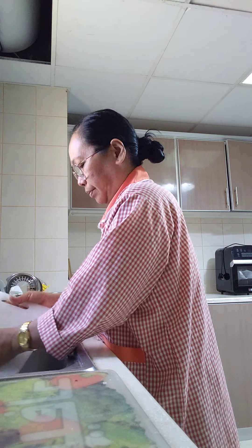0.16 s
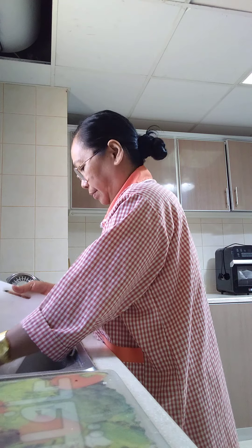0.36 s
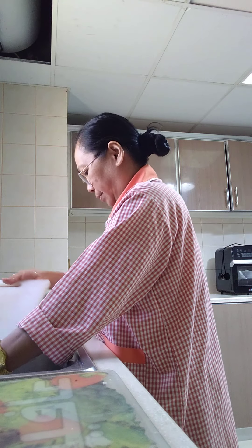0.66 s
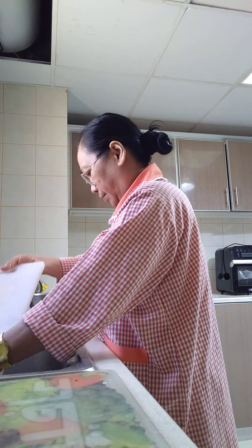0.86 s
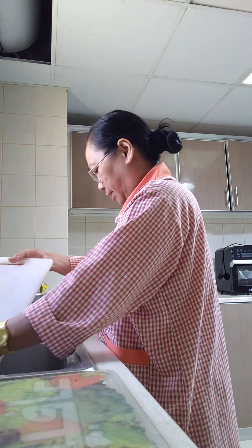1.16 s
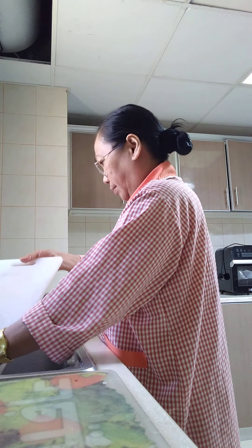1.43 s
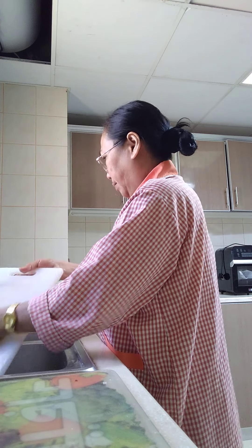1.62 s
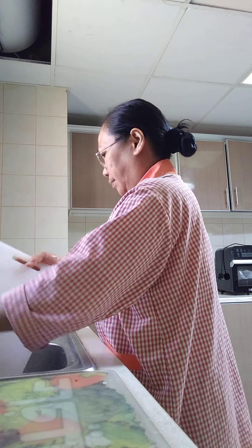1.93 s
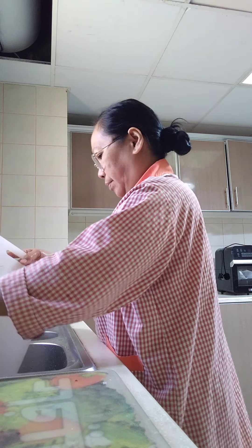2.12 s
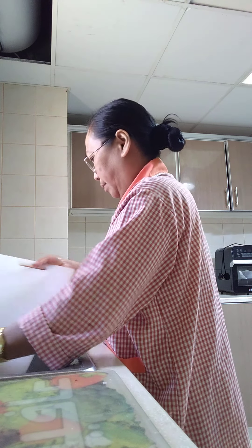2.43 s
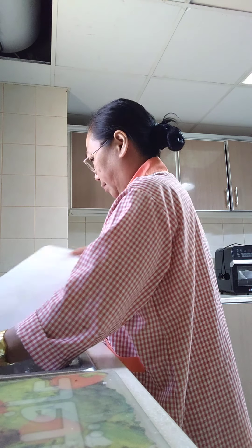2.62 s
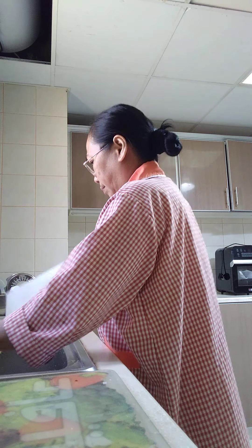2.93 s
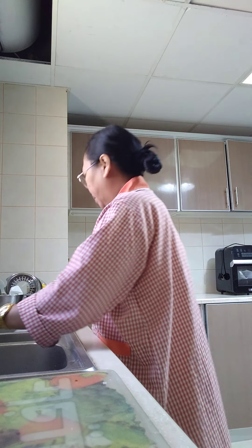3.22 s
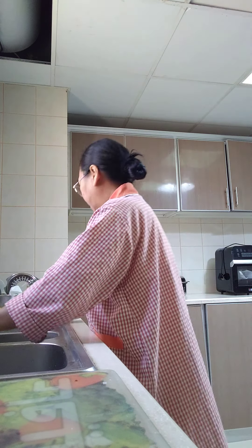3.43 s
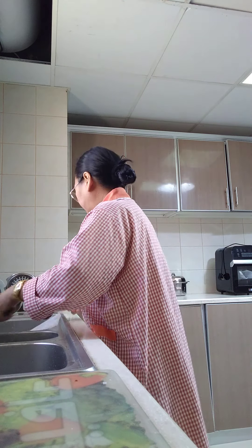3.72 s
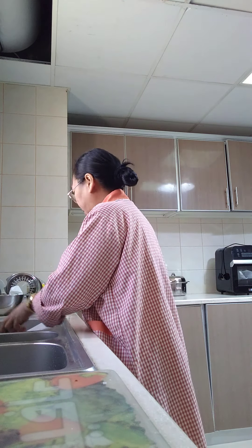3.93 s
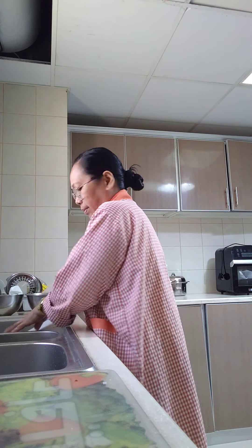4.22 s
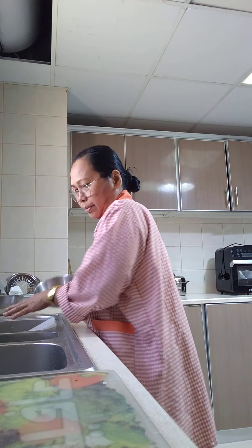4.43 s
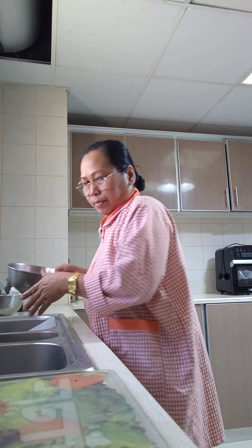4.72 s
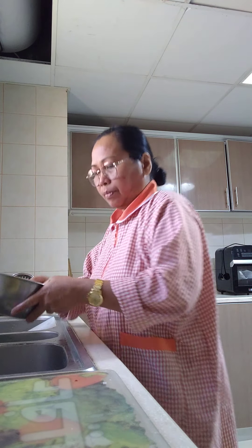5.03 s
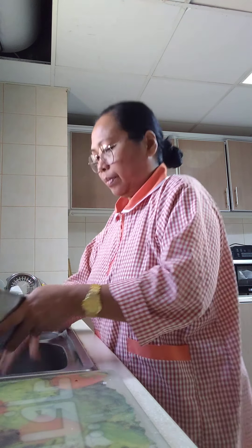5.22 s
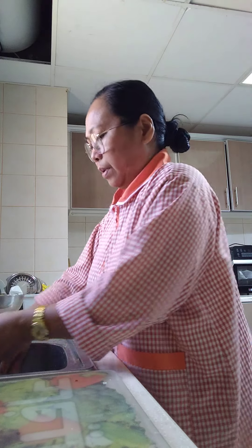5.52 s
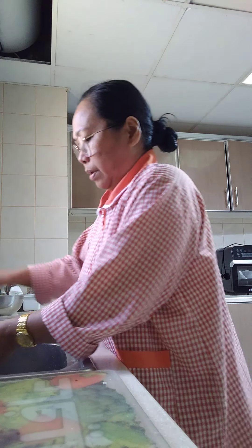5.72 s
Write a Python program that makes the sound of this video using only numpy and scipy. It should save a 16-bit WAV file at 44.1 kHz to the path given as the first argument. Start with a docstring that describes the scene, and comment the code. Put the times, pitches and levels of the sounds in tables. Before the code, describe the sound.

Close phone pickup beside a kitchen sink: steady fine water hiss, with a heavy thud and rattle at once, ticking drips, and occasional bumps. Just after three seconds, rapid booming knocks, drags and clanks on the steel basin last about a second, then watery gurgles and a few faint clatters, with a short tiled echo.

```python
"""A hard knock and a clatter come first, over a tap running into a steel kitchen sink; a plastic board and
a steel bowl are then rinsed, dragged and set down. Water is shaped noise plus swarms of ringing drops and
bubbles; knocks and rattles ring damped modes of basin and rim; drags shake the basin with noise.
A tiled room answers over a faint rumble. A phone with two microphone ports stands on the counter,
the sink about 2 cm nearer the left port."""
import sys
import numpy as np
from scipy import signal
from scipy.fft import rfft, irfft, next_fast_len
from scipy.io import wavfile
from scipy.ndimage import uniform_filter1d, map_coordinates

SR = 44100
rng = np.random.default_rng(int(sys.argv[2]) if len(sys.argv) > 2 else 0)


def transcribe(u):
    """Save the signal u as a 16-bit wav file named by the first command-line argument.

    u: samples, shape (n,) or (channels, n), limited to [-1, 1]; the rate is SR.
    q: integer samples, one column per channel.
    """
    v = np.clip(np.atleast_2d(u).T, -1, 1)
    q = np.round(v * 32767).astype(np.int16)
    wavfile.write(sys.argv[1], SR, q)


N = 258337  # samples, about 5.86 s


def amp(db):
    """Decibels to gain."""
    return 10 ** (np.asarray(db) / 20)


def unit(x):
    """Scales a signal to rms 1."""
    return x / np.sqrt(np.mean(x ** 2) + 1e-20)


def along(points, hz):
    """Reads (f/Hz, value) points on a log frequency axis."""
    f, v = np.transpose(points)
    return np.interp(np.log(hz + 1), np.log(f + 1), v)


def curves(rows):
    """One dB curve over time per level column; -120 dB outside the table."""
    s, *cols = np.transpose(rows)
    t = np.arange(N) / SR
    ends_early = s[-1] < N / SR - .05  # a table that reaches the end of the scene holds its last value
    return [np.interp(t, s, c, -120, -120 if ends_early else c[-1]) for c in cols]


def wobble(rate):
    """A smooth random curve with rate knots a second."""
    knots = rng.standard_normal(int(N * rate / SR) + 4)
    return map_coordinates(knots, [np.arange(N) * rate / SR])


def filtered(x, response):
    """Applies a complex response of frequency to x."""
    m = next_fast_len(x.shape[-1] + SR // 2)
    spectrum = rfft(x, m) * response(np.fft.rfftfreq(m, 1 / SR))
    return irfft(spectrum, m)[..., :x.shape[-1]]


def add(track, s, sound):
    """Mixes a sound into the track at s seconds."""
    part = track[round(s * SR):][:len(sound)]
    part += sound[:len(part)]


def patchy_noise(patchy_db):
    """Two unrelated noises sharing patches of random gain in time and frequency."""
    z = signal.stft(rng.standard_normal((2, N + 512)), nperseg=512)[2]
    field = uniform_filter1d(rng.standard_normal(z.shape[1:]), 6, 0)
    field = uniform_filter1d(field, 8, 1)
    return signal.istft(z * amp(patchy_db * unit(field)), nperseg=512)[1][:, :N]


def grains(count, hz, spread, cycles, scatter_db, rise, size):
    """Two unrelated swarms of damped drops whose pitch rises."""
    draw = rng.random((count, 3))  # loudness, moment, swarm
    pitch = np.clip(hz * np.exp(spread * rng.standard_normal((count, 1))), 200, 15000)
    turns = pitch * np.arange(size) / SR
    body = np.sin(2 * np.pi * turns * (1 + rise * turns / cycles))
    body = body * np.exp(-turns / cycles) * (1 - np.exp(-2 * turns))
    loudness = amp(-scatter_db * np.log(draw[:, :1] + 0.006))  # a few drops are large
    body = body * loudness * np.hanning(2 * size)[size:]
    start = (draw[:, 1:2] * (N - size)).astype(int)
    at = start + np.arange(size) + (draw[:, 2:] > .5) * (N + size)  # the second swarm follows the first
    both = np.bincount(at.ravel(), body.ravel(), 2 * (N + size))
    return unit(both.reshape(2, -1)[:, :N])


def whitened(pair):
    """Flattens the long-term spectrum of a pair."""
    hz, power = signal.welch(pair, SR, nperseg=256)
    return unit(filtered(pair, lambda f: np.interp(f, hz, power.mean(0)) ** -.5))


def spread_out(pair, spectrum, alike):
    """Colours a pair and turns it into left and right of set likeness, at a fixed total power."""
    def mid_side(hz):
        turn = np.arccos(np.clip(along(alike, hz), -1, 1)) / 2
        return amp(along(spectrum, hz)) * [np.cos(turn), np.sin(turn)]

    mid, side = filtered(pair, mid_side)
    return np.array([mid + side, mid - side]) * np.sqrt(2 / (np.var(mid) + np.var(side)))


def favour(hz, centre_hz, boost_db, width):
    """The place of the blow drives the modes near one pitch hardest; the others lose up to boost_db."""
    return boost_db * (np.exp(-.5 * (np.log(hz / centre_hz) / width) ** 2) - 1)


def ring(modes, tilt_db, attack, damp, drift, t):
    """One blow: every mode at a new strength and phase; shifting water and load nudge the pitches."""
    hz, db, t60 = np.transpose(modes)[..., None]
    luck = rng.standard_normal((len(modes), 3))  # strength, phase, pitch
    phase = 2 * np.pi * hz * (1 + drift * luck[:, 2:]) * t + 1.61 * luck[:, 1:2]
    level_db = db + tilt_db + 2 * luck[:, :1] - 60 * t / (t60 * damp)
    tones = amp(level_db) * np.sin(phase)
    return tones.sum(0) * (1 - np.exp(-t / attack))


# the jet before its wavering: t/s, spray level/dB, bubbling level/dB
JET_LEVELS = [(0, -38, -43), (.1, -35.5, -41.5), (.43, -37, -50), (1.0, -36.5, -52), (1.4, -37, -48),
              (1.65, -34, -43.5), (1.88, -35.5, -52), (2.04, -38, -50), (2.07, -35, -46),
              (2.28, -33, -45.5), (2.68, -36.5, -46.5), (2.73, -34.5, -45.5), (2.93, -35, -43),
              (3.0, -36.5, -48), (3.25, -34.5, -42), (3.5, -34, -37.5), (3.7, -35, -41.5),
              (4.04, -33.5, -43.5), (4.8, -34.5, -46), (5.25, -35, -46), (5.56, -33, -41), (5.68, -35, -46),
              (5.858, -35, -46)]
# colours of hiss, torn-in air and bubbling: f/Hz, relative level/dB
SPRAY_COLOUR = [(750, -39), (1200, -36), (1600, -9), (2100, -10), (2700, -9), (3300, -7), (4800, -4),
                (6500, -3.5), (7500, -7), (8800, -10.5), (11000, -22), (14000, -34)]
AIR_COLOUR = [(5500, -39), (7500, -4), (8600, -11), (9600, 7), (11000, 4.5), (12300, 6), (13500, 4),
              (14500, 8.5), (15700, 5)]
GURGLE_COLOUR = [(220, -54), (380, -39.5), (551, -6), (661, -15.5), (856, -10.5), (958, -3.5), (1430, -5.5),
                 (1580, -5), (2050, -8), (3000, -2.5), (3900, -12), (6600, -120)]
# how alike the water is at the two ports: f/Hz, correlation (1 = the same)
WATER_LIKENESS = [(400, 1), (1000, 0.28), (4000, 0.073), (8000, 0.05), (15000, 0.046)]
# lean of the water between the ports: f/Hz, left minus right level/dB
WATER_LEAN = [(60, -34), (150, 0), (380, -3), (950, 1.5), (2380, 1), (5980, -1.5), (15000, -2)]
AIR_DB, AIR_FOLLOWS = -42, 0.81  # mean level of torn-in air before wavering; dB it moves per dB of spray


def tap():
    """The jet breaks into fine drops, traps bubbles and hisses; the flow wavers."""
    spray_db, bubble_db = curves(JET_LEVELS)
    air_db = AIR_DB + AIR_FOLLOWS * (spray_db - spray_db.mean())
    waver_db = 0.66 * wobble(6.1) + 0.45 * wobble(15)
    fizz = whitened(grains(count=30000, hz=5360, spread=0.54, cycles=1.1, scatter_db=2, rise=0.028, size=64))
    bubbles = whitened(grains(count=4000, hz=1212, spread=0.408, cycles=2.86, scatter_db=2.5,
                              rise=0.065, size=600))
    spray = spread_out(0.34 * fizz + unit(patchy_noise(1.54)), SPRAY_COLOUR, WATER_LIKENESS)
    air = spread_out(0.31 * fizz + unit(patchy_noise(3.3)), AIR_COLOUR, WATER_LIKENESS)
    gurgle = spread_out(0.53 * bubbles + 1.15 * unit(patchy_noise(2.36)), GURGLE_COLOUR, WATER_LIKENESS)
    water = amp(spray_db + waver_db) * spray
    water = water + amp(air_db + 1.05 * waver_db + 0.26 * wobble(9.6)) * air
    water = water + amp(bubble_db + 1.0 * wobble(5.87)) * gurgle
    return filtered(water, lambda hz: amp(along(WATER_LEAN, hz) * [[.5], [-.5]]))


# knocks: t/s, thud level/dB, favoured f/Hz, thud t60/s (held to 0.015 or more),
# ring of the draining board under the thud/dB
KNOCK_EVENTS = [(0, -7.5, 226, 0.06, -29), (.106, -7.5, 251, 0.027, -28), (.134, -20, 241, 0.028, -29),
                (.426, -46, 267, .035, -17), (1.545, -19.5, 225, 0.066, -26),
                (1.599, -26.5, 239, 0.017, -33), (1.802, -43.5, 255, 0.023, -31),
                (1.976, -55, 249, .04, -35), (2.264, -29.5, 243, .02, -29), (2.335, -26, 256, 0.036, -26),
                (2.516, -54, 262, 0.038, -34), (3.152, -8.5, 282, 0.073, -41),
                (3.166, -6, 247.5, 0.11, -26), (3.301, -23.5, 334, 0.025, -14),
                (3.343, -9, 169, 0.055, -32), (3.408, -11, 248, 0.034, -19),
                (3.422, -10.5, 300, .035, -18.5), (3.434, -12.5, 395, 0.039, -15.5),
                (3.453, -9, 230, 0.043, -26), (3.473, -12, 327, 0.031, -28), (3.484, -13, 222, 0.05, -26),
                (3.499, -18.5, 336, 0.061, -11), (3.574, -17.5, 268, .03, -16),
                (3.604, -14.5, 321, .074, -16), (3.644, -14.5, 244, 0.055, -17),
                (3.702, -31, 237, 0.061, -19), (3.738, -15, 240, 0.045, -20),
                (3.774, -10.5, 228.5, 0.079, -30), (3.809, -9, 370, 0.071, -12),
                (3.849, -12.5, 253, 0.028, -19), (3.881, -9, 267, 0.071, -19),
                (3.92, -18.5, 370, 0.026, -14), (3.952, -48, 235, 0.035, -20),
                (4.023, -22.5, 403, 0.11, -4.5), (4.061, -1, 238, 0.051, -34), (4.077, -4, 408, 0.099, -34),
                (4.114, 0.5, 296, 0.014, -33), (4.17, -8, 220, 0.029, -33), (4.239, -18, 394, 0.031, -20),
                (4.299, -26, 349, 0.036, -21), (4.378, -35, 408, .05, -34), (4.459, -33, 288, 0.075, -17),
                (5.238, -64, 242, .04, 4), (5.375, -42.5, 261, 0.038, -36), (5.45, -44.5, 257, 0.04, -30),
                (5.585, -28.5, 258, 0.024, -17), (5.629, -30, 215, 0.055, -23)]
# modes of basin and counter: f/Hz, relative level/dB, free t60/s
BASIN_MODES = [(48.5, 8, 0.14), (64.6, 8, 0.47), (95, 9.5, 0.26), (133.8, 2, 0.77), (151.8, -1, 0.21),
               (176.2, -8, 0.26), (190.2, -5.5, 0.17), (230, 2, 0.37), (249.3, -2, 0.58), (273.2, 2, 0.24),
               (310.3, -1.5, 0.46), (341.6, -3.5, 0.3), (395.4, -2.5, 0.22), (404.8, -0.5, 0.27),
               (421, -5, 0.53), (472.4, -4.5, 0.45), (538.5, -7.5, 0.4), (619.8, 0, 0.23),
               (652.5, -5.5, 0.2), (698, -10.5, 0.11), (757, -8, 0.13), (811, -10, 0.35), (857, -11.5, 0.5)]
FULL_DB = -10  # thud level of a firm knock
COUNTER_DB, FLOOR_DB, WALLS_DB = -33, -16.5, -20.5  # ring of each part under the thud of a firm knock
COUNTER_GAIN, FLOOR_GAIN, WALLS_GAIN = 0.23, 0.32, 0.21  # dB each ring grows per dB a knock is gentler
BOARD_DB, COUNTER_WITH_BOARD = -22, 0.46  # usual board ring; dB the counter follows per dB of board ring
CONTACT_SHARE = 0.067  # rise of a knock as a share of its thud's t60


def knocks():
    """The thing set down thuds; its force rings counter, draining board, basin floor and walls.
    A heavy landing stays pressed on the steel, so gentle knocks ring more freely."""
    out, t = np.zeros(N), np.arange(SR * 6 // 10) / SR
    hz = np.array(BASIN_MODES)[:, :1]
    for s, db, centre_hz, t60, board_db in KNOCK_EVENTS:
        t60 = max(t60, .015)
        gentle_db = FULL_DB - db
        rise = CONTACT_SHARE * t60
        counter_db = COUNTER_DB + COUNTER_GAIN * gentle_db + COUNTER_WITH_BOARD * (board_db - BOARD_DB)
        floor_db = FLOOR_DB + FLOOR_GAIN * gentle_db + favour(hz, centre_hz, 6.4, 0.081)
        walls_db = WALLS_DB + WALLS_GAIN * gentle_db
        # the counter holds the lowest modes, then the board, the floor (160-450 Hz) and the walls
        tilt_db = np.select([hz < 110, hz < 160, hz > 450], [counter_db, board_db, walls_db], floor_db)
        thud = amp(-60 * t / t60) * (1 - np.exp(-t / rise)) * np.sin(2 * np.pi * centre_hz * t)
        add(out, s, amp(db) * (thud + ring(BASIN_MODES, tilt_db, rise, 0.83, 0.013, t)))
    return out


# hard edges clattering: t/s, reference level/dB, favoured f/Hz, treble level/dB and clink level/dB
# relative to that reference
CLATTER_EVENTS = [(.0004, -24.5, 1225, -23, -5), (.103, -11, 1140, -0.2, -16), (0.1245, -14, 1650, -13, -9),
                  (0.1602, -18.5, 1130, -3, -23), (1.558, -31.5, 2930, -7, 2),
                  (2.047, -33.5, 2240, 13.5, -18), (2.2684, -27.5, 2400, -4, -15),
                  (3.153, -21.5, 1150, -26, -19), (3.344, -28.5, 1127, -5, -2),
                  (3.514, -16, 1602, 2.5, 0.5), (3.5841, -25.5, 1650, -8, -13), (3.739, -24.5, 926, -4, -3),
                  (3.809, -25.5, 1154, -11, -5), (3.8798, -23, 2750, -5, -19),
                  (4.0576, -13, 1580, -6.5, -18), (4.1112, -15, 1550, 3, -5), (4.1682, -17, 1208, -19, -19),
                  (5.3538, -31, 1130, -6, -13), (5.5746, -25.5, 2170, 8.5, -4),
                  (5.6247, -39, 2170, 9.5, -14)]
# modes of the rim: f/Hz, relative level/dB, free t60/s
RIM_MODES = [(1030, -13, 0.06), (1186, 1, 0.12), (1263, -12.5, 0.42), (1574, 0.5, 0.15),
             (1648, -12.5, 0.065), (1816, -12.5, 0.8), (2208, -4.5, 0.26), (2470, -8, 0.31),
             (2637, -5, 0.46), (2644, -10, 0.73), (3955, -13.5, 0.27)]
RATTLE_T60_S, RIM_DAMP = 0.16, 0.19  # how long an edge rattles; share of the rim's free t60 the load leaves


def clatter():
    """Hard edges clink, ring the rim and rattle on with a burst of noise for tiny impacts."""
    out, t = np.zeros(N), np.arange(SR // 2) / SR
    hz = np.array(RIM_MODES)[:, :1]
    for s, db, centre_hz, treble_db, clink_db in CLATTER_EVENTS:
        # the contact comes and goes
        bounces = np.interp(t, np.linspace(0, t[-1], num=70), rng.standard_normal(size=70))
        rattle = rng.standard_normal(len(t)) * amp(1.84 * bounces)
        rattle = rattle * amp(-60 * t / RATTLE_T60_S) * (1 - np.exp(-t / 0.0012))
        colour = [(350, -6.5), (800, -3), (2500, -5.0),
                  (5000, treble_db - 1.5), (8000, treble_db - 9), (14000, treble_db - 26.5)]
        rattle = filtered(rattle, lambda f: amp(along(colour, f)))
        tilt_db = np.where(hz > 3000, treble_db - 10, favour(hz, centre_hz, 8.0, 0.26))
        rim = ring(RIM_MODES, tilt_db, 0.0018, RIM_DAMP, 0.0118, t)
        add(out, s, amp(db - 1.5) * rim + amp(db + 4) * rattle)
        clink = (1 - np.exp(-t / 0.0025)) * np.sin(2 * np.pi * centre_hz * t)  # of the edge itself
        add(out, s, amp(db + clink_db - 60 * t / 0.062) * clink)
    return out


def basin_response(f):
    """The basin's modes as resonances of alternating sign, shaken steadily instead of struck."""
    total = 0
    for k, (c, db, t60) in enumerate(BASIN_MODES):
        resonance = 1j * f * (4.5 / t60) / (c * c - f * f + 1j * f * 0.79 / t60)
        total = total + (-1) ** k * amp(db) * resonance
    return total


# board and bowl dragged over the steel, one list a drag: t/s, level/dB before smoothing
DRAG_STROKES = [
    [(3.25, -39), (3.324, -31), (3.588, -34.5), (4.05, -40)],
    [(4.3, -74), (4.372, -42.5), (4.636, -64), (4.7, -75)],
    [(5.2, -74), (5.288, -59), (5.414, -57), (5.588, -45), (5.74, -50), (5.858, -58)],
]


def drag():
    """Stick and slip, as flickering noise, shake the basin modes without pause."""
    slips = rng.standard_normal(N) * amp(2.4 * wobble(32))
    strength = sum(amp(curves(rows)[0]) for rows in DRAG_STROKES)
    strength = uniform_filter1d(strength, 1500)
    return filtered(strength * slips, basin_response) / np.std(filtered(slips, basin_response))


def patter():
    """Falling water keeps the basin floor faintly shaking, most around 241 Hz."""
    drive = amp(8.8 * wobble(6.5)) * rng.standard_normal(N)
    shaken = filtered(drive, lambda f: basin_response(f) * amp(favour(f + 1, 241, 22, 0.12)))
    return amp(-73.5) * unit(shaken)


# single large bubbles: t/s, level/dB before decay, nominal f/Hz
PLOP_EVENTS = [(.755, -48, 577), (.904, -47, 532), (2.144, -41, 1120), (2.507, -41.5, 610),
               (2.665, -36, 970), (2.714, -40, 1070), (2.714, -46, 577), (4.703, -45, 1130),
               (4.806, -35, 1074), (4.855, -47, 620), (4.899, -39, 1040), (5.163, -36, 1084),
               (5.234, -43, 1185), (5.299, -37.5, 970), (5.405, -44, 1120)]


def plops():
    """A large bubble rings briefly, rising as it nears the surface."""
    out, t = np.zeros(N), np.arange(SR // 16) / SR
    for s, db, hz in PLOP_EVENTS:
        tone = np.sin(2 * np.pi * hz * t * (.95 + 3 * t))
        add(out, s, amp(db - 60 * t / 0.097) * (1 - np.exp(-t / 0.002)) * tone)
    return out


# drops ticking on the board: t/s, level/dB before decay
DRIP_EVENTS = [(.499, -34), (.528, -21.5), (.634, -30), (.69, -36), (0.77, -25), (.878, -23.5), (.891, -26),
               (0.906, -24), (0.992, -26), (1.122, -26), (1.201, -23), (1.216, -18.5), (1.275, -23),
               (1.368, -21.5), (1.466, -28), (1.88, -23), (1.946, -28), (2.597, -34), (2.627, -22),
               (2.711, -29), (5.101, -33), (5.353, -20)]
DRIP_HZ, DRIP_SCATTER = 1230, 0.045  # pitch of a drop and its relative spread from drop to drop


def drips():
    """A drop on hard plastic dies within a few cycles, with an overtone."""
    out, t = np.zeros(N), np.arange(SR // 50) / SR
    for s, db in DRIP_EVENTS:
        hz = DRIP_HZ * (1 + DRIP_SCATTER * rng.standard_normal())
        tick = 0.5 * np.sin(2 * np.pi * hz * t) + 0.64 * np.sin(2 * np.pi * 1.406 * hz * t)
        add(out, s, amp(db - 60 * t / 0.013) * (1 - np.exp(-t / 0.00099)) * tick)
    return out


# how long the tiled room answers: f/Hz, t60/s
TILE_DECAY = [(60, 0.29), (250, 0.48), (1000, 0.51), (4000, 0.44), (12000, 0.25)]


def room_tail():
    """Each frequency of the room's answer dies at its own speed; the ports agree most near 350 Hz."""
    hz, t, z = signal.stft(rng.standard_normal((2, SR * 3 // 4)), SR, nperseg=256)
    share = along([(50, 1.0), (130, 0.41), (350, 0.24), (900, 0.98)], hz)[:, None]  # of unlike sound
    z = np.array([z[0] + share * z[1], z[0] - share * z[1]])
    z = z * amp(-60 * t / along(TILE_DECAY, hz)[:, None])
    tail = signal.istft(z, SR, nperseg=256)[1]
    return tail / np.linalg.norm(tail[0])


REDRAW_S = .15  # s between fresh random draws of the room's answer, which keep its colour even


def kitchen(x):
    """Overlapping stretches of the sound each get a freshly drawn room answer, a little late."""
    step = round(REDRAW_S * SR)
    x = np.pad(x, (step, 2 * step))
    out = np.zeros((2, N + 4 * step + SR))
    fade = signal.windows.hann(2 * step, False)
    for at in range(0, N + step, step):
        stretch = x[at:at + 2 * step] * fade
        answer = signal.fftconvolve(stretch[None], room_tail(), axes=1)
        out[:, at + 300:][:, :answer.shape[1]] += answer  # 300 samples late
    return out[:, step:step + N]


# quiet kitchen rumble: f/Hz, relative level/dB
RUMBLE_COLOUR = [(12, -64), (20, -34), (35, -9), (49, 3), (124, -6), (188, -60), (217, -35), (282, -25),
                 (347, -45), (450, -11), (580, -33), (990, -120)]


def rumble():
    """Patchy low noise behind everything, wavering about -70 dB."""
    noise = spread_out(patchy_noise(5.2), RUMBLE_COLOUR, [(30, 1.0), (400, 0.39)])
    return amp(-70 + 1 * wobble(3.9)) * noise


LEAD = 68e-6  # s by which the left port hears the sink first


def ports(x):
    """The sound reaches the two microphone ports a little apart."""
    return filtered(x, lambda hz: np.exp(2j * np.pi * hz * LEAD * np.array([[.5], [-.5]])))


def scene():
    """Water and handling straight from the sink, then the room's answer and the rumble."""
    low = knocks() + drag() + patter()
    high = clatter()
    drops = plops() + drips()
    # [left], [right] gains in dB
    direct = low * amp([[-.6], [.6]]) + high * amp([[-3.5], [-3]]) + drops * amp([[.8], [-.8]])
    room = amp(-5.5) * kitchen(low) + amp(-0.5) * kitchen(high + amp(-5) * drops)
    return ports(direct + tap()) + room + rumble()


TOP_HZ = 15800  # band limit of the phone


def record(dry):
    """The microphones lose the deepest bass; the phone keeps nothing above its band limit."""
    return filtered(dry, lambda hz: (hz < TOP_HZ) * (1j * hz / (38 + 1j * hz)) ** 3)


dry = scene()
out = record(dry)
transcribe(out)
```